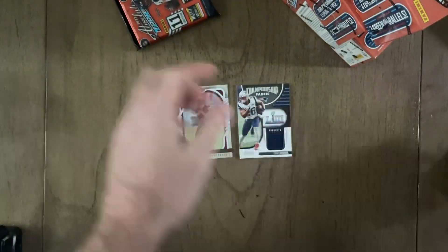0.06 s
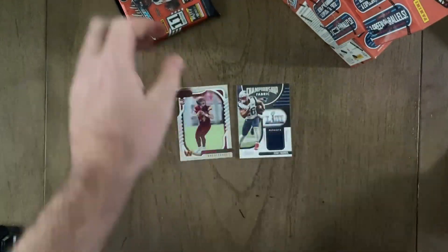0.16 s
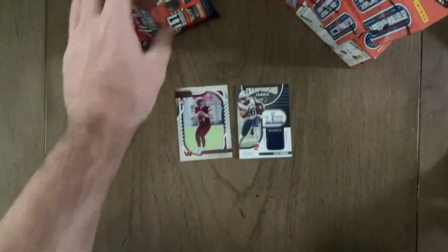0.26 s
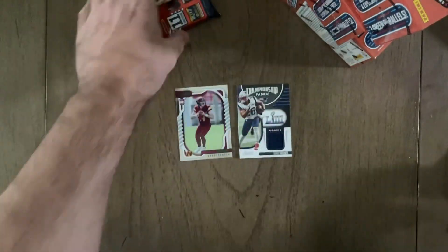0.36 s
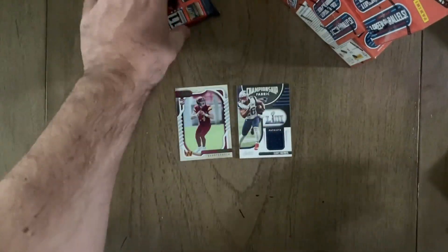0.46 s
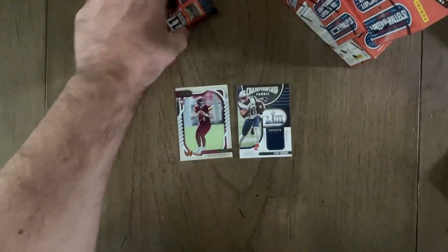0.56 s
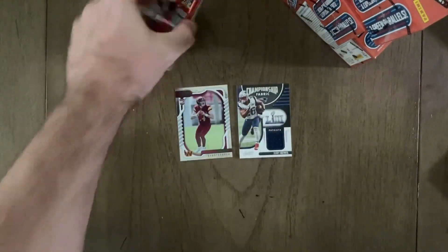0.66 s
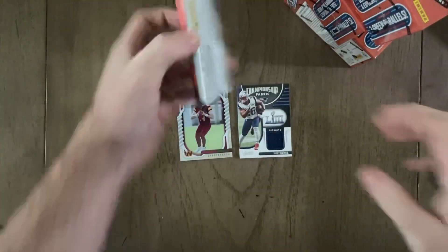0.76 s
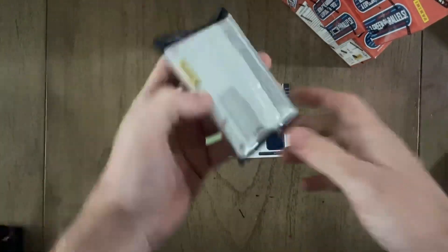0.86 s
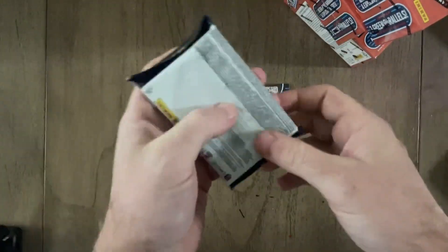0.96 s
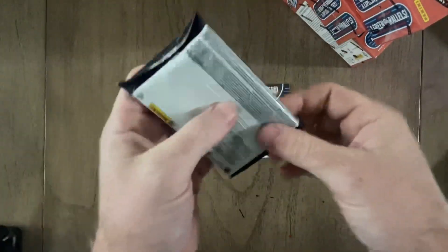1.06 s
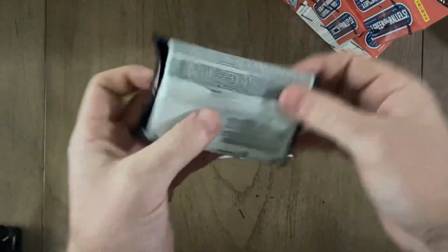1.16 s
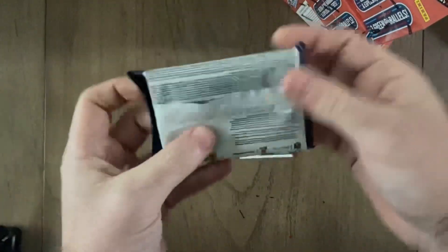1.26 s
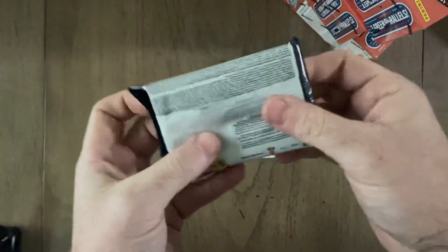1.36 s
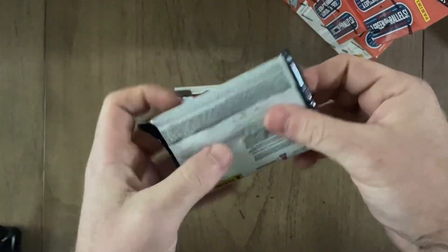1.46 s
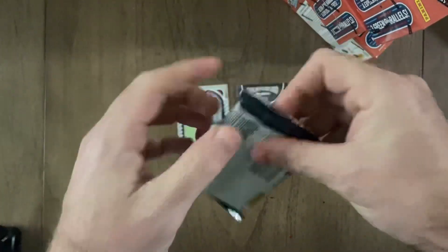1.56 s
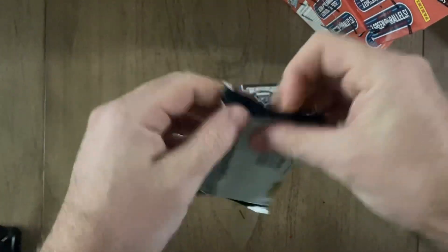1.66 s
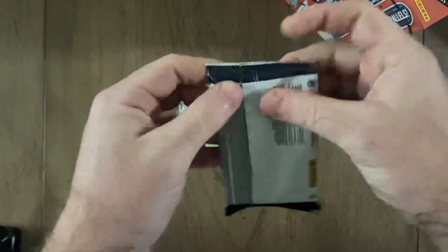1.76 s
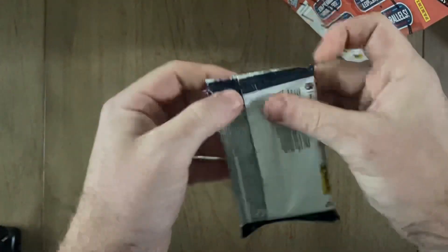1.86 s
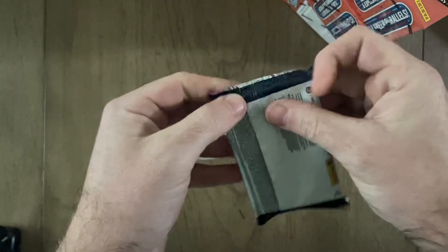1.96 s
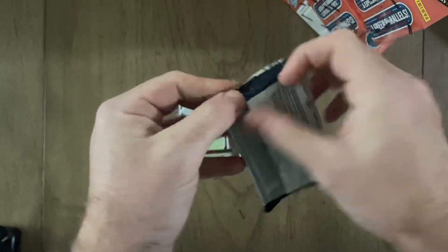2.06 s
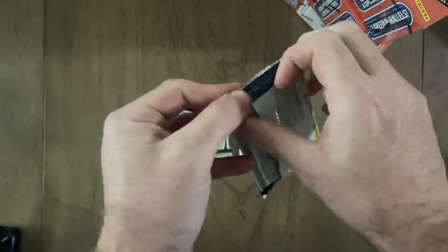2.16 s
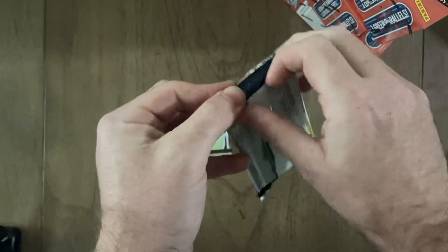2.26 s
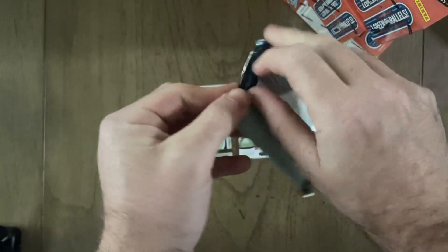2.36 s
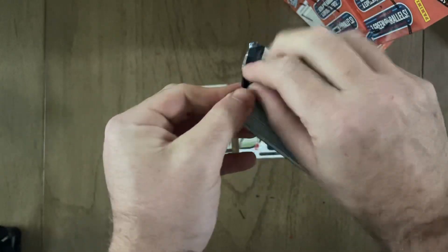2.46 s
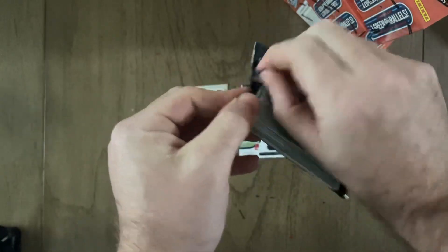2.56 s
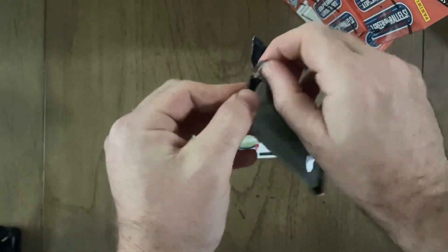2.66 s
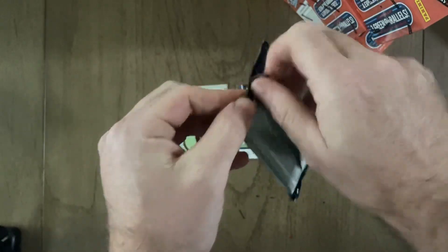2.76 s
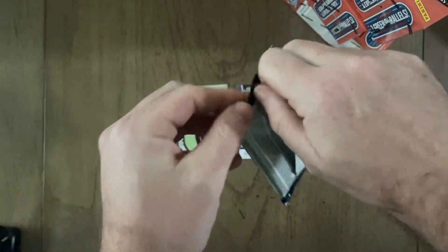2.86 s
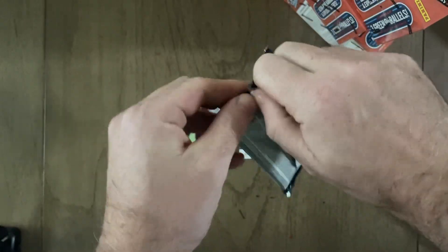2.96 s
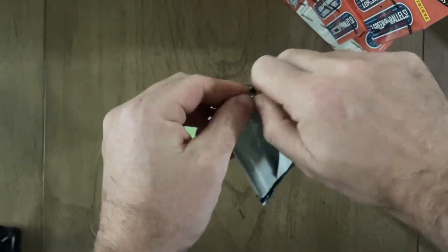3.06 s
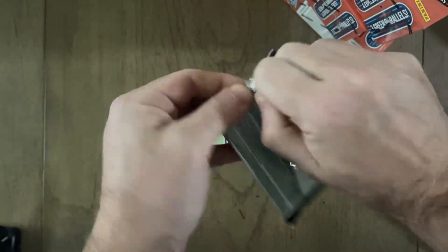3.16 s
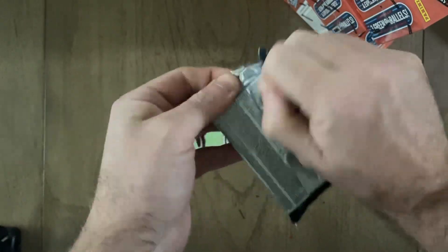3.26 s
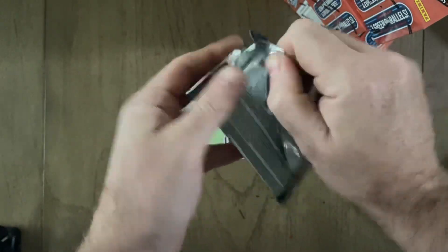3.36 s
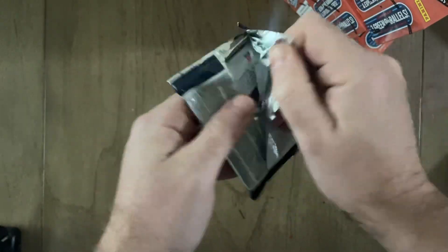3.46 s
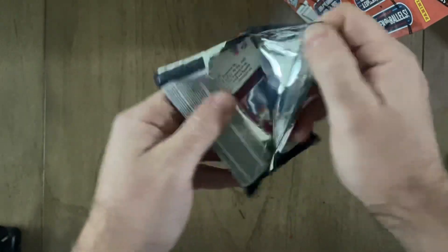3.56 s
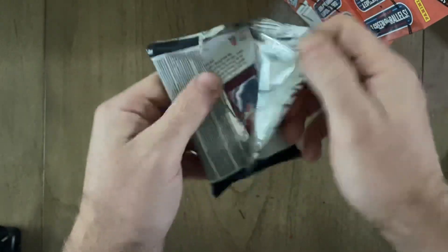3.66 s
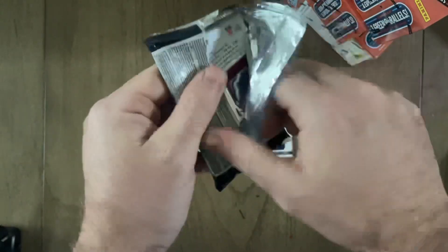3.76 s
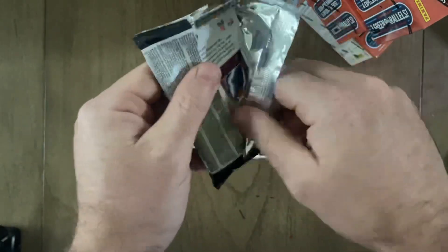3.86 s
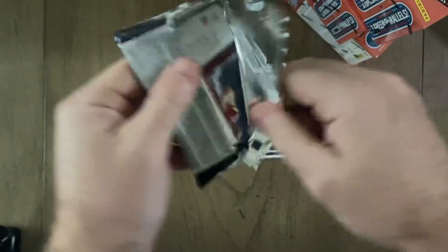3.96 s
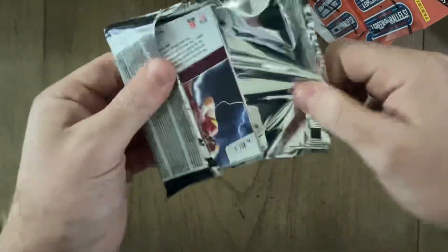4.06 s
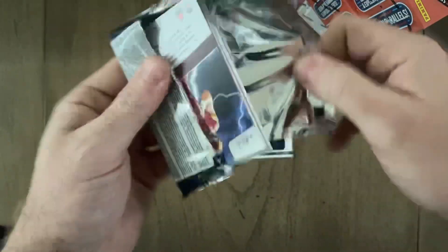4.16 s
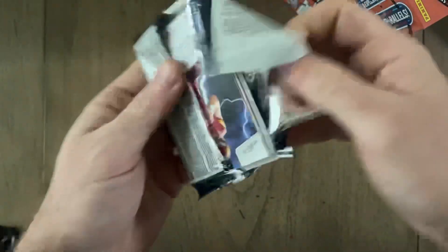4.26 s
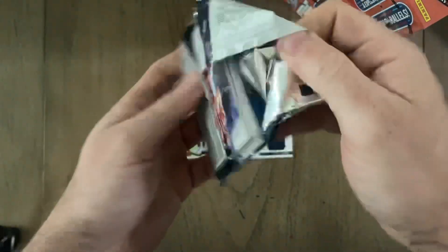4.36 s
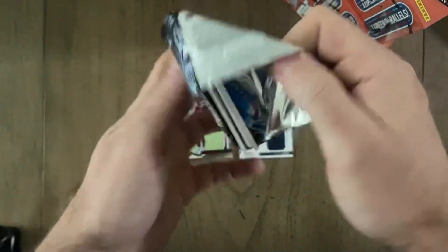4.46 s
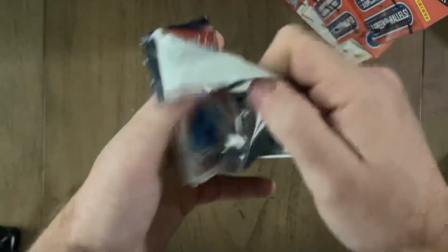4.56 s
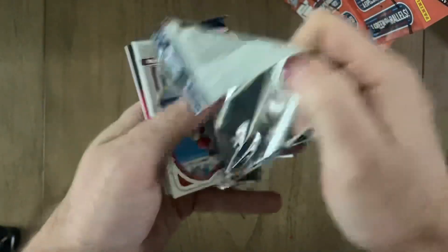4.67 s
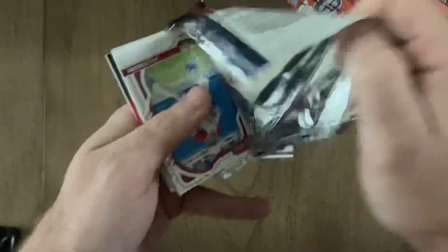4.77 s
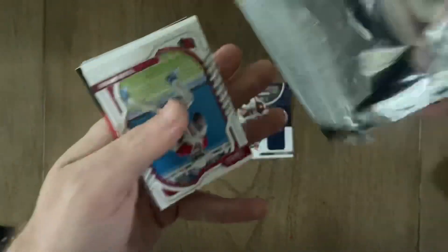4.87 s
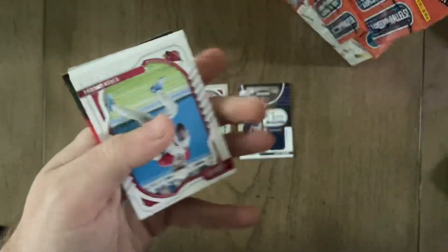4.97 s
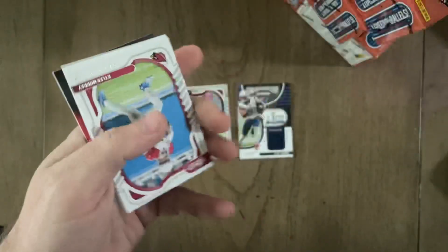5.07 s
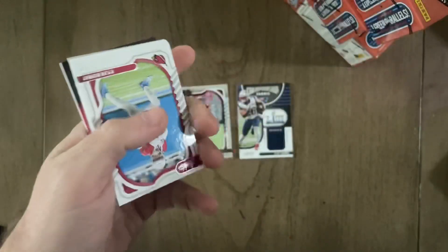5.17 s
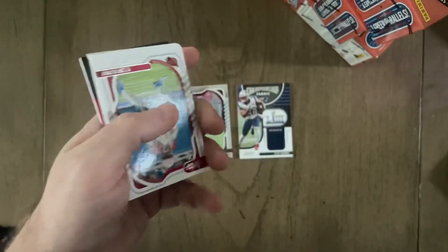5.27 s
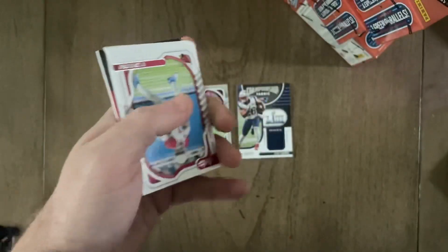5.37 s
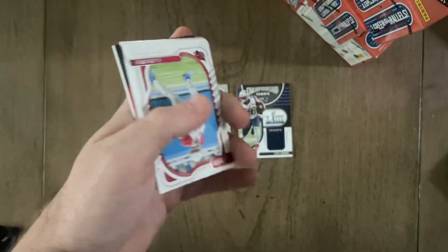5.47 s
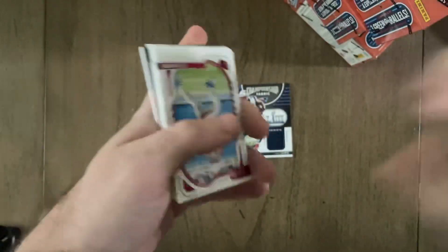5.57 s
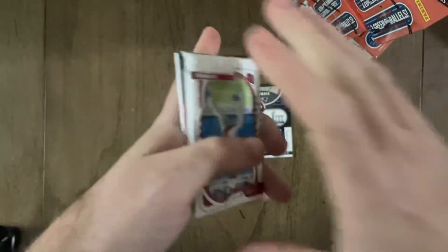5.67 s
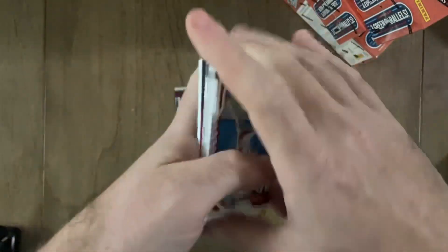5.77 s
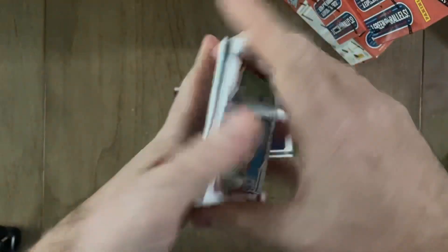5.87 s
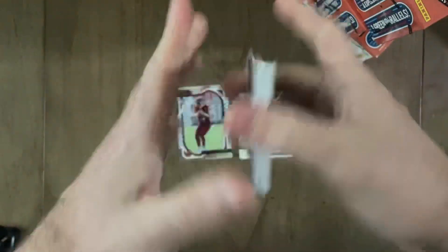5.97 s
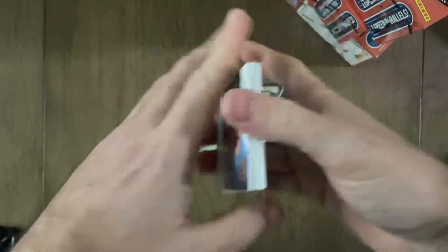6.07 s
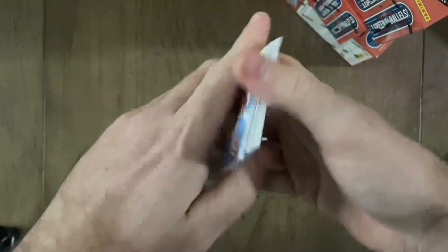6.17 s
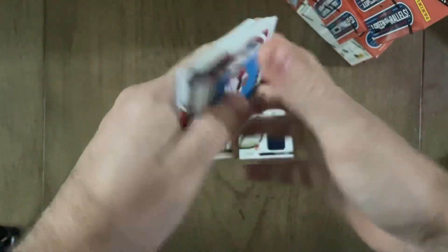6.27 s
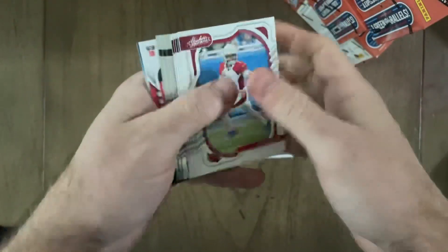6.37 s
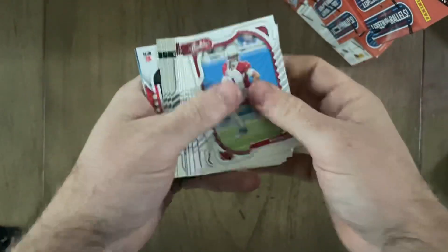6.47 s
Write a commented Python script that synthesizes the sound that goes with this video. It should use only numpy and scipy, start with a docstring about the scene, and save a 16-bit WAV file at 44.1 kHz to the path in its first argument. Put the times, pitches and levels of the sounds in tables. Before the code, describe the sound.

Close foil crackle builds from light grips to a loud tearing burst and flapping wrapper, ending in faint card rubs and taps in a quiet room.

```python
"""Opening a foil pack of cards

Hands pick a foil pack of trading cards off a wooden table, turn it, pinch the seam, rip it and peel the wrapper away.
Foil snaps are kicked resonances over a crackle of tiny clicks; tear, flutter and sliding cards are shaped grain noise.
Filtered noise and decaying sines make the dull handling and the table; the bare cards slide and tap at the end.
A pair of microphones close above the table hears it in a small, quiet room, made of decaying noise tails."""
import sys
import numpy as np
from scipy import signal
from scipy.fft import rfft, irfft, next_fast_len
from scipy.io import wavfile
from scipy.ndimage import uniform_filter1d, map_coordinates

SR = 44100
rng = np.random.default_rng(int(sys.argv[2]) if len(sys.argv) > 2 else 0)


def pcm_store(signal):
    """Save signal as 16-bit PCM."""
    levels = np.round(np.clip(np.atleast_2d(signal), -1, 1) * 32767)
    wavfile.write(sys.argv[1], SR, levels.astype(np.int16).T)


N = 287532

# The arms rest and shift on the table. Each row: time in seconds, weight in dB before each layer's trim.
LEANING = [(.04, -59), (.14, -82), (.33, -52.5), (.75, -57), (2, -59), (4.5, -60.5), (5.6, -62.5),
           (6.5, -68)]


def amp(db):
    """Decibels to gain."""
    return 10 ** (np.asarray(db) / 20)


def unit(x):
    """x at rms 1."""
    return x / np.sqrt(np.mean(x ** 2) + 1e-20)


def along(points, hz):
    """(Hz, value) points read on a log frequency axis."""
    f, v = np.transpose(points)
    return np.interp(np.log(hz + 1), np.log(f + 1), v)


def curve(points, **ends):
    """(seconds, value) points as one value per sample."""
    return np.interp(np.arange(N) / SR, *np.transpose(points), **ends)


def wobble(rate):
    """A smooth random curve, rate knots a second."""
    knots = rng.standard_normal(int(N * rate / SR) + 4)
    return map_coordinates(knots, [np.arange(N) * rate / SR])


def filtered(x, response):
    """x times a response of frequency."""
    size = next_fast_len(N + SR // 2)
    hz = np.fft.rfftfreq(size, 1 / SR)
    return irfft(rfft(x, size) * response(hz), size)[..., :N]


def ring(colour_db, size=1024):
    """The causal click, of energy 1, that has a given colour: folding the cepstrum gives minimum phase."""
    hz = np.fft.rfftfreq(size, 1 / SR)
    cepstrum = irfft(np.log(amp(colour_db(hz))))
    cepstrum[1:size // 2] *= 2
    cepstrum[size // 2 + 1:] = 0
    click = irfft(np.exp(rfft(cepstrum)))
    return click / np.linalg.norm(click)


def resonance(hz, pitch, height_db, octaves):
    """The bell-shaped boost in dB, on an octave axis, of a small surface around its own pitch."""
    return height_db * np.exp(-.5 * (np.log2((hz + 1) / pitch) / octaves) ** 2)


def noise(spectrum):
    """Coloured noise of rms 1."""
    return unit(filtered(rng.standard_normal(N), lambda hz: amp(along(spectrum, hz))))


def clumped_sizes(spread_db, clump_db, clump_rate, clump_top):
    """Unequal random click sizes that swell and shrink together in clumps."""
    spread = spread_db * np.minimum(rng.standard_normal(N), 1.5)
    clumps = clump_db * np.minimum(wobble(clump_rate), clump_top)
    return amp(spread + clumps)


def grains(spectrum, rate, spread_db, clump_db):
    """Tiny clicks at random moments (rate a second), unequal in size and bunched in clumps; rms 1."""
    fires = rng.random(N) < rate / SR
    sizes = clumped_sizes(spread_db, clump_db, clump_rate=110, clump_top=1.5)
    kicks = fires * sizes * rng.choice([-1, 1], N) / np.sqrt(rate)
    click = ring(lambda hz: along(spectrum, hz))
    return unit(signal.fftconvolve(kicks, click)[:N])


def patchy(x, depth_db):
    """x with resonances that come and go as the contact shifts."""
    z = signal.stft(x, nperseg=512)[2]
    field = uniform_filter1d(rng.standard_normal(z.shape), size=7, axis=0)
    field = uniform_filter1d(field, size=7, axis=1)
    return unit(signal.istft(z * amp(depth_db * unit(field)), nperseg=512)[1][:N])


def strokes(rows, attack_s, release_s, swell_db=0):
    """Gain of hand movements: each rises, holds or swells to its level, and dies away (seconds per 20 dB)."""
    t = np.arange(0, N, 32) / SR
    power = np.zeros(len(t))
    for start, hold, db in rows:
        to_come = np.clip(1 - (t - start) / max(hold, 1e-3), 0, 1)
        before = np.maximum(start - t, 0) / attack_s
        afterwards = np.maximum(t - start - hold, 0) / release_s
        power += amp(db - swell_db * to_come - 20 * (before + afterwards)) ** 2
    return curve(np.c_[t, np.sqrt(power)])


def clicks(rows, spectrum, facet_db, octaves, usual_treble_db, treble_hz, rise, settle, after, count=600):
    """Each click is one kick among short, weaker noise that swells and fades, ringing a facet at its own pitch."""
    out, lead = np.zeros(N + SR), SR // 400
    t = (np.arange(count) - lead) / SR
    modes_hz = np.geomspace(700, 9000, 20)
    ripple_db = 2  # scatter of each facet's own uneven resonances
    for start, db, pitch, treble_db in rows:
        # rise and settle count cycles of the facet, so low facets swell and fade more slowly
        swell = np.exp(np.minimum(t * pitch / rise, -t * pitch / settle))
        kicks = after * swell * rng.standard_normal(count)
        kicks[lead] = 1
        ripple = np.c_[modes_hz, ripple_db * rng.standard_normal(len(modes_hz))]

        def colour(hz):
            edge = (treble_db - usual_treble_db) * hz ** 4 / (hz ** 4 + treble_hz ** 4)
            facet = resonance(hz, pitch, facet_db, octaves)
            return along(spectrum, hz) + facet + edge + along(ripple, hz)

        click = np.convolve(kicks, ring(colour))
        # the level is the click's energy spread over 5 ms, as an rms
        click *= amp(db) * np.sqrt(SR / 200) / np.linalg.norm(click)
        out[round(start * SR) - lead:][:len(click)] += click
    return out[:N]


def room_hush():
    """The room's low hush: noise common to both microphones plus independent noise in each."""
    # Colour of the quiet room. Each row: frequency in Hz, relative level in dB.
    quiet = [(20, -13.5), (60, -7), (110, 9.5), (250, -5), (450, -17), (1100, -25.5), (2500, -32),
             (6000, -37), (10500, -49.5), (16000, -52.5)]
    apart = np.array([noise(quiet), noise(quiet)])
    return amp(-67.5) * noise(quiet) + amp(-66.0) * apart


def table():
    """An arm that lands on the table rings its low modes; the lowest keeps droning while the arms lean and shift."""
    # Ringing modes of the table top. Each row: frequency in Hz, relative level in dB, 60 dB decay time in seconds.
    modes = [(56.73, 2, 0.87), (82.2, 1, 0.79), (111.6, 0, 0.37)]
    # An arm lands. Each row: start in seconds, gain of the thud in dB.
    landings = [(.215, -43.5), (0.424, -57.5), (1.109, -53.5)]
    soft_s, drone_db, drone_width_hz = .012, -2.5, 5.1  # the width is taken at half amplitude
    out, t = np.zeros(N + SR), np.arange(SR) / SR
    ringing = sum(amp(db - 60 * t / t60) * np.sin(2 * np.pi * hz * t) for hz, db, t60 in modes)
    thud = ringing * (1 - np.exp(-t / soft_s))
    for start, db in landings:
        out[round(start * SR):][:SR] += amp(db) * thud
    lowest_hz = modes[0][0]
    narrow = lambda hz: 1 / (1 + (2 * (hz - lowest_hz) / drone_width_hz) ** 2)
    drone = unit(filtered(rng.standard_normal(N), narrow))
    return out[:N] + amp(drone_db + curve(LEANING)) * drone


def handling(sheet):
    """Shoves and leaning arms rumble; hands and the billowing wrapper make dull, lumpy noises."""
    # The hands shove and jolt the pack. Each row: start in seconds, hold in seconds, boom level in dB.
    bump_rows = [(.217, 0.068, -41.5), (.42, 0.053, -55), (3.46, 0.039, -57), (3.79, 0.0221, -55),
                 (4.025, .02, -46.5), (4.19, 0.043, -50.5), (4.81, 0.06, -35.5)]
    # The opened wrapper billows against hands and stack. Each row: start in seconds, hold in seconds, level in dB.
    billow_rows = [(3.552, 0.0059, -44.5), (3.79, 0.0082, -51.5), (3.955, 0.017, -39.5),
                   (4.04, 0.014, -31.5), (4.19, 0.06, -41.5), (4.33, 0.065, -50.5), (4.51, 0.014, -39.5),
                   (4.575, 0.018, -35.5), (4.665, 0.035, -38), (4.745, 0.025, -31), (4.8, 0.032, -31),
                   (4.85, 0.039, -35.5)]
    # Colour of the boom. Each row: frequency in Hz, relative level in dB.
    boom_colour = [(20, -15), (40, -12), (57, 3), (80, 2), (105, 1), (140, -3.5), (250, -35), (800, -69.5)]
    # Colour of the dull hand noise. Each row: frequency in Hz, relative level in dB.
    hand_colour = [(50, -29), (100, -1), (170, -7.5), (260, -0.5), (340, -5), (500, -24.5), (1000, -28.5),
                   (3000, -63)]
    # the knock is the dull noise that goes with the boom; the skin rustles under leaning arms
    knock_db, skin_db, flutter_db = -9, -10, -21
    bumps = strokes(bump_rows, attack_s=0.02, release_s=0.033)
    lean = amp(curve(LEANING))
    billow = strokes(billow_rows, attack_s=0.0088, release_s=0.03)
    billow = np.hypot(billow, amp(flutter_db) * sheet)  # a little of it goes with all flutter
    dull = np.sqrt(billow ** 2 + (amp(knock_db) * bumps) ** 2 + (amp(skin_db) * lean) ** 2)
    boom = np.hypot(bumps, amp(-2.5) * lean) * noise(boom_colour)
    return boom + dull * grains(hand_colour, rate=1100, spread_db=1.5, clump_db=4)


def cards():
    """Smooth faces rub with a hush whose colour shifts, card edges brush more thinly, and corners tap."""
    # The pack slides off the table, later a thumb rubs the bare stack.
    # Each row: start in seconds, hold in seconds, level in dB before the mix.
    rub_rows = [(.197, 0.022, -54.5), (.245, 0.014, -74), (.468, 0.015, -56.5), (.56, 0.11, -71),
                (4.97, 0.12, -59), (5.16, 0.06, -55.5), (5.335, 0.034, -56.5), (5.42, 0.075, -64.5),
                (5.51, 0.037, -60.5)]
    # Pack and card edges touch.
    # Each row: time in seconds, level in dB before the mix, pitch in Hz, share of treble in dB.
    tap_rows = [(.201, -40.5, 3060, -28), (.4981, -45.5, 2880, -26), (.5617, -51.5, 1510, -16),
                (5.1397, -50, 1290, -44), (5.1571, -40.5, 3140, -26), (5.2199, -55, 1030, -42),
                (5.2689, -45.5, 4630, -9), (5.3184, -55, 1500, -18), (5.3478, -46.5, 3060, -18),
                (5.483, -60, 2530, -22), (5.8475, -61, 2254, -37), (6.1081, -59, 2300, -34),
                (6.1375, -52, 2600, -40), (6.204, -54.5, 1900, -28)]
    # The cards are squared up. Each row: start in seconds, hold in seconds, level in dB before the mix.
    brush_rows = [(5.785, 0.062, -70.5), (6.13, 0.015, -65), (6.178, 0.038, -58), (6.438, 0.042, -64.5)]
    # Colour of card faces and taps. Each row: frequency in Hz, relative level in dB.
    face_colour = [(100, -4.5), (300, 9.5), (700, 7.5), (1100, 2.5), (1600, 0.5), (2500, -2.5), (4400, 0),
                   (5400, -9), (6500, -17), (7800, -43), (10500, -42.5), (14000, -55)]
    # Colour of brushed card edges. Each row: frequency in Hz, relative level in dB.
    edge_colour = [(200, 6.5), (1000, -4), (1600, -3.5), (2500, 1), (4600, -5.5), (6000, -15.5),
                   (7800, -39), (14000, -42)]
    faces = patchy(grains(face_colour, rate=1800, spread_db=5, clump_db=3), depth_db=1.5)
    edges = patchy(grains(edge_colour, rate=1500, spread_db=4.5, clump_db=3), depth_db=1.5)
    rub = strokes(rub_rows, attack_s=0.041, release_s=0.12) * faces
    brush = strokes(brush_rows, attack_s=0.03, release_s=0.064) * edges
    taps = clicks(tap_rows, face_colour, facet_db=14.0, octaves=0.45, usual_treble_db=-50, treble_hz=6150,
                  rise=0.27, settle=7.2, after=0.39)
    return amp(-1.0) * rub + amp(-5.5) * brush + amp(-6.5) * taps


def working():
    """Grips, pulls and steady strain add up to the effort on the foil; a slack sheet turns it into flutter."""
    # Fingers take a new grip and the foil crackles. Each row: start in seconds, hold in seconds, effort in dB.
    grip_rows = [(.795, 0.0089, -52), (.905, 0.018, -49), (1.03, 0.016, -52), (1.12, 0.025, -52),
                 (1.19, 0.035, -53.5), (1.325, 0.008, -49), (1.55, 0.038, -52.5), (1.68, 0.012, -43.5),
                 (1.74, 0.0093, -50), (2.105, 0.015, -56), (2.29, 0.072, -51.5), (2.475, 0.025, -44.5),
                 (2.54, 0.022, -37.5), (2.7, 0.075, -55.5), (2.89, 0.061, -50.5), (3.16, 0.033, -31.5),
                 (3.29, 0.057, -41.5), (3.66, 0.022, -43), (3.93, 0.015, -37), (4.165, 0.039, -35.5),
                 (4.225, 0.014, -35), (4.33, 0.046, -39.5), (4.505, 0.016, -40.5), (4.575, 0.018, -37.5),
                 (4.662, 0.017, -36), (4.74, 0.017, -37.5)]
    # Long pulls build up until the wrapper gives way.
    # Each row: start in seconds, length in seconds, final effort in dB.
    pull_rows = [(3.425, 0.13, -38.5), (3.955, 0.066, -30), (4.778, 0.075, -32.5)]
    # Steady strain on the pack between grips. Each row: time in seconds, effort in dB.
    strain_points = [(.76, -90), (.86, -63.5), (1.85, -66), (2.42, -60.5), (2.62, -57), (3.08, -63),
                     (3.3, -50), (3.6, -50), (3.75, -60.5), (4.08, -47), (4.45, -49), (4.94, -47),
                     (5.02, -65)]
    # Slackness of the sheet, least while the seam is pinched taut.
    # Each row: time in seconds, flutter over effort in dB.
    slack = [(1.15, -2), (1.35, -0.5), (1.75, 1), (2.1, 0.5), (2.52, -7.5), (3.18, -16), (3.36, 1.5),
             (3.7, -1), (3.93, 7.5), (4.04, 10), (4.15, 2), (4.35, 0.5), (4.85, 5)]
    grips = strokes(grip_rows, attack_s=0.023, release_s=0.057)
    pulls = strokes(pull_rows, attack_s=0.034, release_s=0.085, swell_db=2.5)
    strain = amp(curve(strain_points, left=-np.inf, right=-np.inf))
    effort = np.sqrt(grips ** 2 + pulls ** 2 + strain ** 2)
    return effort, effort * amp(curve(slack))


def buckles(effort, count=500):
    """The clear snaps, and chance ones whose number and size follow the effort."""
    # The clearest buckles of the foil.
    # Each row: time in seconds, level in dB before the mix, pitch of the facet in Hz, share of treble in dB.
    snap_rows = [(0.7978, -43.5, 2600, -4), (0.9075, -43, 3020, -22), (0.9829, -45.5, 2690, -20),
                 (1.024, -52, 2930, -21), (1.0306, -42, 1690, -22), (1.073, -38, 4000, -30.5),
                 (1.1081, -44.5, 4300, -28), (1.118, -42.5, 4000, -29), (1.1351, -42, 2400, -36),
                 (1.1568, -49, 3000, -24), (1.1867, -33.5, 2230, -51), (1.2415, -47, 2970, -46),
                 (1.3251, -33, 1620, -10.5), (1.4129, -50.5, 4100, -5), (1.4507, -40.5, 2980, -7),
                 (1.4606, -43.5, 2150, -53), (1.5051, -40, 2980, -12), (1.5239, -46, 3190, -13),
                 (1.5685, -44.5, 2900, -8), (1.5753, -39.5, 2050, -11.5), (1.632, -47, 3110, -20),
                 (1.671, -37, 3100, -10.5), (1.681, -40.5, 4570, -6.5), (1.6848, -34.5, 1320, -16),
                 (1.6985, -45, 4160, -7.5), (1.7395, -31.5, 1250, -13.5), (1.7465, -42, 3600, -12),
                 (1.89, -40.5, 3340, -18), (1.9341, -37.5, 2900, -23), (1.9942, -46.5, 3480, -17),
                 (2.0731, -47, 1570, -36), (2.0973, -38, 2870, -28), (2.1178, -38.5, 3140, -14),
                 (2.2544, -39, 3770, -12), (2.2883, -39, 2870, -2.5), (2.3018, -35, 2810, -37),
                 (2.335, -40, 2763, 4), (2.474, -29.5, 1982, -14.5), (2.533, -29, 3000, -11),
                 (2.5406, -32.5, 2720, -8.5), (2.5492, -33, 3320, -14), (2.5565, -27.5, 2690, -9.5),
                 (2.565, -38, 3050, -12), (2.6013, -35, 2800, -14.5), (2.657, -40.5, 2260, -51),
                 (2.7337, -31, 2830, -5.5), (2.7682, -45, 3300, -2), (2.8215, -44.5, 2670, -14),
                 (2.831, -41, 3280, -12), (2.8831, -42, 2100, -14.5), (2.8985, -35.5, 3590, -4.5),
                 (2.9289, -31.5, 2430, -17), (2.9352, -34.5, 2710, -10), (2.9769, -43.5, 2800, -18),
                 (2.9838, -34, 3960, -12.5), (3.0669, -42.5, 3860, -15.5), (3.0909, -29.5, 3380, -22),
                 (3.1707, -30, 2400, -1.5), (3.1767, -26.5, 4400, -14.5), (3.1837, -29, 1770, -18),
                 (3.194, -33.5, 4000, -18), (3.2012, -33, 2230, -21), (3.2136, -29, 1690, -33.5),
                 (3.2304, -33, 3160, -24.5), (3.2621, -40.5, 3800, -17.5), (3.2855, -28, 1870, -21),
                 (3.3003, -30, 1158, -14), (3.338, -31, 1230, -31.5), (3.3841, -29, 1970, -17),
                 (3.416, -36.5, 2800, -16), (3.4258, -26.5, 1400, -16.5), (3.4415, -33.5, 2600, -20.5),
                 (3.4597, -32, 2530, -14.5), (3.4806, -35, 1500, -20), (3.5167, -29.5, 2500, -12.5),
                 (3.5301, -24.5, 1760, -19), (3.5459, -26, 1000, -25.5), (3.552, -13.5, 1140, -27.5),
                 (3.5579, -27.5, 1380, -30), (3.6142, -31, 1290, -37), (3.6487, -41.5, 2800, -19.5),
                 (3.6597, -41, 2500, -25), (3.6741, -35.5, 1775, -10), (3.7038, -39, 2350, -16.5),
                 (3.791, -29.5, 1160, -23), (3.832, -42, 1700, -25.5), (3.8481, -22.5, 1250, -26),
                 (3.8559, -39.5, 2060, -3), (3.878, -40, 2340, -9), (3.9061, -35.5, 2760, -25.5),
                 (3.9177, -31, 1237, -21), (3.9485, -24.5, 1040, -13.5), (3.9512, -25.5, 1080, -26),
                 (3.9555, -11.5, 1030, -52), (3.9806, -16.5, 1088, -20), (3.9879, -18, 1080, -17.5),
                 (3.9983, -16.5, 1500, -15.5), (4.0149, -27.5, 1160, -24.5), (4.033, -28, 1900, -25.5),
                 (4.042, -17, 1100, -36.5), (4.0511, -15, 990, -47.5), (4.0896, -42, 1370, -3),
                 (4.147, -34, 950, -32), (4.1575, -29, 1080, -29), (4.1664, -18.5, 1205, -29),
                 (4.1712, -27.5, 3100, -22.5), (4.223, -29.5, 1080, -23), (4.2607, -31.5, 1380, -24),
                 (4.305, -31, 2170, -29), (4.331, -29, 3800, -19.5), (4.3453, -33.5, 950, -25),
                 (4.3559, -30, 990, -29.5), (4.3977, -25, 2020, -16.5), (4.4744, -25.5, 1160, -26),
                 (4.506, -29, 1230, -21.5), (4.5483, -35.5, 2900, -21), (4.5772, -25, 1790, -23),
                 (4.5838, -19.5, 1905, -24.5), (4.5992, -36.5, 2630, -22), (4.6229, -34.5, 2490, -26),
                 (4.6444, -22, 1770, -22.5), (4.662, -30, 2150, -19), (4.6695, -28, 2370, -16),
                 (4.6806, -26, 3210, -16), (4.7069, -27.5, 2880, -17.5), (4.748, -22.5, 2270, -22),
                 (4.782, -28, 1230, -13), (4.801, -26, 2270, -24), (4.809, -26.5, 2270, -26.5),
                 (4.821, -27, 2240, -24), (4.832, -26, 2620, -26), (4.8419, -24.5, 3000, -23.5),
                 (4.847, -25.5, 1500, -23), (4.8721, -28.5, 1900, -21), (4.9528, -40, 2150, -21)]
    # strays come this often at the usual effort; more effort brings more
    strays_per_s, usual_effort_db, growth = 16, -50.5, .45
    level_db, level_scatter_db = -1, 1.5  # over the effort
    typical_hz, scatter_octaves = 2480, 0.24
    treble_db, treble_scatter_db = -9.5, 3.5
    due = np.cumsum(strays_per_s * (effort / amp(usual_effort_db)) ** growth) / SR
    moments = np.searchsorted(due, np.cumsum(rng.exponential(size=count)))
    luck = np.clip(rng.standard_normal((count, 3)), -2, 2)
    strays = []
    for i, (size, pitch, edge) in zip(moments, luck):
        if SR // 2 < i < N:
            db = 20 * np.log10(effort[i] + 1e-9) + level_db + level_scatter_db * size
            hz = typical_hz * 2 ** (scatter_octaves * pitch)
            strays.append((i / SR, db, hz, treble_db + treble_scatter_db * edge))
    return list(snap_rows) + strays


def snapping(effort):
    """Large foil facets buckle from one shape to another, each a snap at the facet's own pitch."""
    # Colour of the snaps. Each row: frequency in Hz, relative level in dB.
    snap_colour = [(60, -20.5), (250, -8), (480, 1), (720, -2.5), (1100, 1.5), (1600, -5.5), (2500, 0.5),
                   (4400, 0), (6000, -8), (7800, -18.5), (10500, -18), (14000, -33), (16000, -30.5)]
    return clicks(buckles(effort), snap_colour, facet_db=11, octaves=0.6, usual_treble_db=-19.5,
                  treble_hz=5290, rise=1.1, settle=2.5, after=0.15)


def crackle(effort, count=30):
    """Harder handling fires more creases a second; each one rings a small facet with a narrow pitch of its own."""
    # Colour of the creases. Each row: frequency in Hz, relative level in dB.
    crease_colour = [(200, -30), (700, -18), (1200, -2.5), (1700, 1.5), (2500, 0.5), (3400, -2.5),
                     (4700, -2.5), (6000, -7.5), (7800, -28), (10500, -26.5), (14000, -36.5), (16000, -30)]
    busy = np.clip(450 * (effort / .01) ** .35, 400, 900)  # creases a second
    pitches = np.geomspace(980, 5086, count)  # Hz, from the largest to the smallest creases
    facets = [ring(lambda hz: along(crease_colour, hz) + resonance(hz, pitch, height_db=10, octaves=.22))
              for pitch in pitches]
    sizes = clumped_sizes(spread_db=5.5, clump_db=3.5, clump_rate=90, clump_top=1.2)
    kicks = sizes * rng.choice([-1, 1], N) / np.sqrt(busy)
    which = rng.integers(count, size=N)
    out = np.zeros(N + SR)
    for i in np.flatnonzero(rng.random(N) < busy / SR):
        out[i:i + len(facets[0])] += kicks[i] * facets[which[i]]
    return effort * unit(out[:N])


def tearing(effort):
    """The tear's fizz grows faster with effort than the crackle."""
    # Colour of the tear. Each row: frequency in Hz, relative level in dB.
    tear_colour = [(2000, -35), (6000, -13.5), (8000, 7), (11000, 1.5), (14000, -14), (16000, -3)]
    fizz = grains(tear_colour, rate=2000, spread_db=5, clump_db=3)
    return effort * (effort / 0.065) ** .5 * fizz


def fluttering(sheet):
    """The freed sheet flutters: grains whose resonances shift."""
    # Colour of the loose sheet. Each row: frequency in Hz, relative level in dB.
    sheet_colour = [(60, -39.5), (200, -11.5), (420, 2), (700, -4), (1120, -2), (1500, -12), (2500, -10),
                    (6000, -39.5), (16000, -65)]
    return sheet * patchy(grains(sheet_colour, rate=550, spread_db=6.5, clump_db=3.5), depth_db=1.5)


def foil(effort, sheet):
    """Big facets snap; around them creases crackle, the seam fizzes as it rips and the freed sheet flutters."""
    sharp = amp(-0.8) * snapping(effort) + amp(-3.0) * crackle(effort)
    return sharp + amp(-17.5) * tearing(effort) + amp(-1.5) * fluttering(sheet)


def reflections(x, decay, delay):
    """x through a new decaying noise tail for each microphone, scaled to energy 1 on the left."""
    hz, t, z = signal.stft(rng.standard_normal((2, SR // 3)), SR, nperseg=128)
    fade = amp(-60 * t / along(decay, hz)[:, None])
    tail = signal.istft(z * fade, SR, nperseg=128)[1]
    tail = np.pad(tail / np.linalg.norm(tail[0]), ((0, 0), (round(delay * SR), 0)))
    return signal.oaconvolve(x[None], tail, axes=1)[:, :N]


def room(x, count=28):
    """Table and hands scatter the sound at once, in a pattern that shifts as they move; the walls answer later."""
    # Sound that arrives unscattered. Each row: frequency in Hz, share of the power from 0 to 1.
    direct_share = [(1000, .97), (2300, .82), (4000, .55), (5400, .05), (6200, .25), (7400, .7),
                    (10000, .8)]
    # Decay of the room. Each row: frequency in Hz, 60 dB decay time in seconds.
    room_decay = [(200, 0.013), (1500, 0.06), (3000, 0.23), (4800, 0.46), (8000, 0.043), (15000, 0.17)]
    far_db, aim_db = -11, 2
    place = np.linspace(0, count - 1, N)
    poses = [x * np.sqrt(np.maximum(1 - abs(place - k), 0)) for k in range(count)]
    near = sum(reflections(pose, [(1000, 0.024)], delay=0) for pose in poses)
    far = sum(reflections(pose, room_decay, delay=.005) for pose in poses)
    # facets face their own ways: left against right wanders
    aim = amp(aim_db * np.outer([1, -1], wobble(45)))
    aim = aim / np.sqrt(np.mean(aim ** 2, axis=0))
    direct = aim * filtered(x, lambda hz: np.sqrt(along(direct_share, hz)))
    scattered = filtered(near, lambda hz: np.sqrt(1 - along(direct_share, hz)))
    return direct + scattered + amp(far_db) * far


def scene():
    """Foil and cards in the room, over handling noise, the table and the room's low hush."""
    effort, sheet = working()
    in_room = room(foil(effort, sheet) + cards())
    return in_room + handling(sheet) + table() + room_hush()


def record(dry):
    """The two microphones differ in phase and level, round off the hardest peaks and keep nothing above a limit."""
    # Phase between the microphones. Each row: frequency in Hz, lead of the left in radians.
    port_phase = [(20, 0), (100, .25), (170, .6), (260, 2), (400, 2.8), (700, 3.4), (1000, 3.9),
                  (1700, 5.2), (4300, 5.3), (5200, 4.3), (5700, 1.3), (6500, 2), (7800, 3.2), (10000, 5.6),
                  (14500, 9.2)]
    # Level between the microphones. Each row: frequency in Hz, left minus right in dB.
    port_balance = [(60, .3), (120, 2.5), (230, 7), (450, 6), (700, 3), (1300, 2.8), (2400, 2), (3700, .8),
                    (5500, 1.8), (9000, .5)]
    top_hz = 16200

    def ports(hz):
        lean = amp(along(port_balance, hz) / 2) * np.exp(.5j * along(port_phase, hz))
        pair = np.array([lean, 1 / lean])
        return pair / np.sqrt(np.mean(abs(pair) ** 2, axis=0))

    heard = filtered(dry, ports)
    rounded = heard / (1 + (heard / .78) ** 4) ** .25
    return filtered(rounded, lambda hz: hz < top_hz)


dry = scene()
out = record(dry)
pcm_store(out)
```